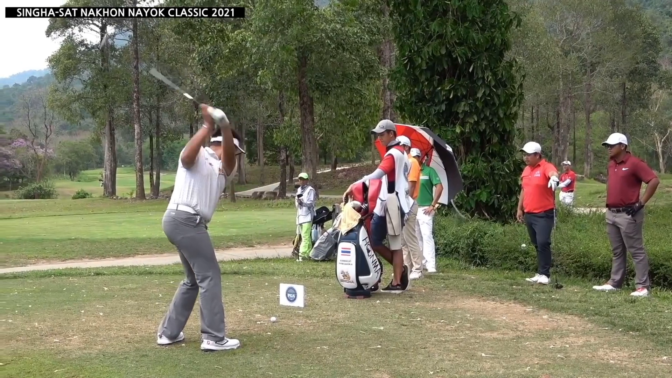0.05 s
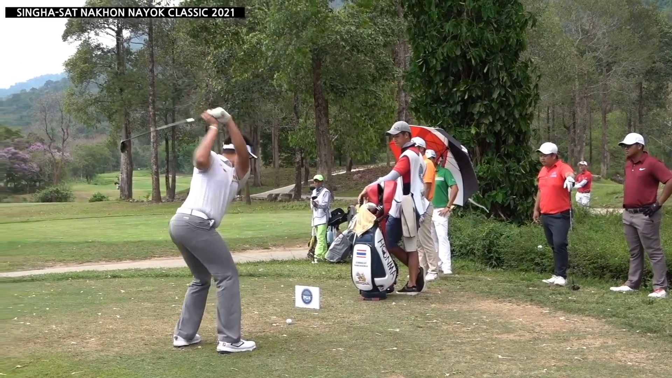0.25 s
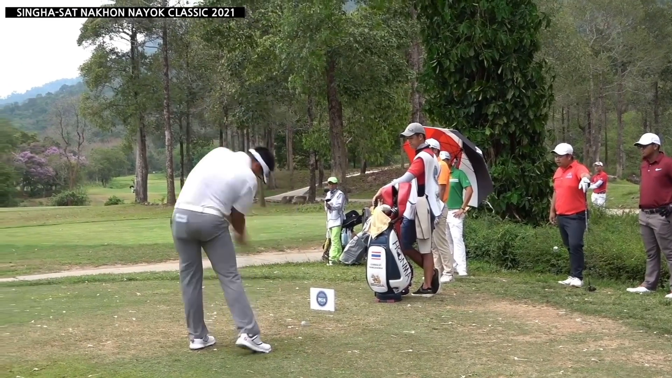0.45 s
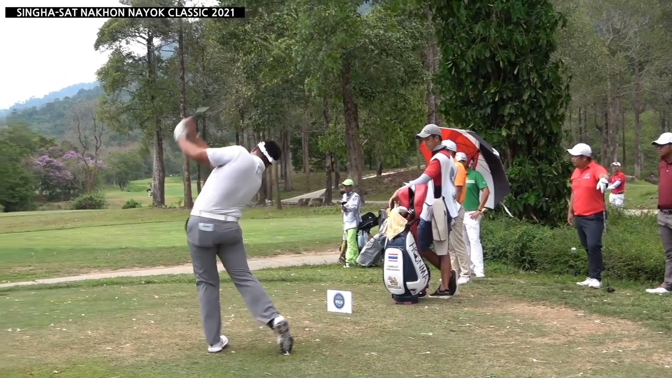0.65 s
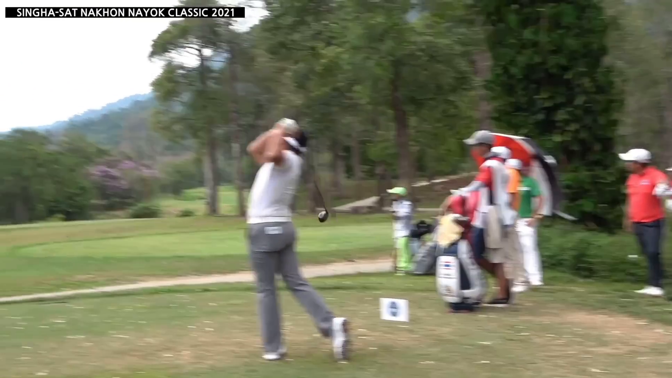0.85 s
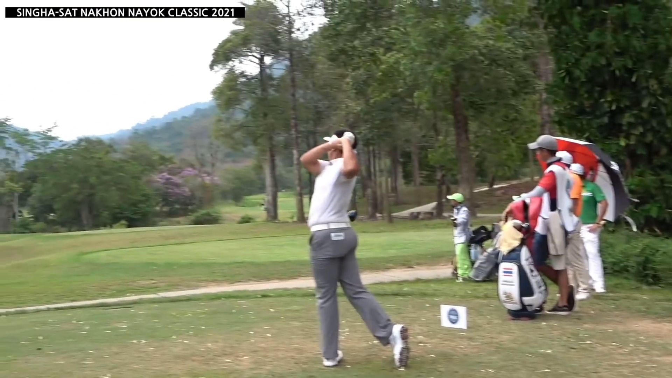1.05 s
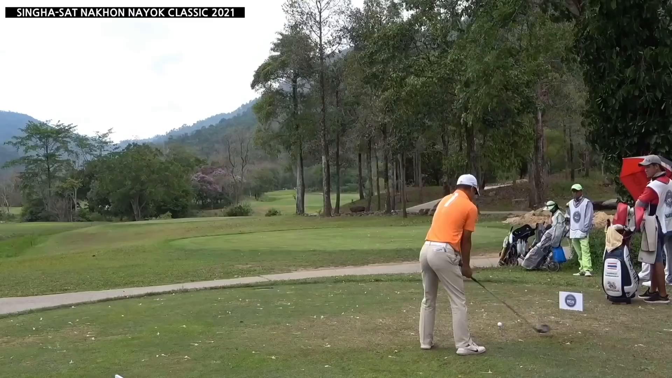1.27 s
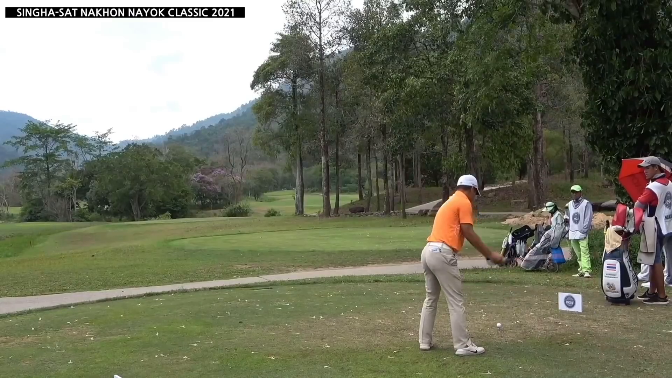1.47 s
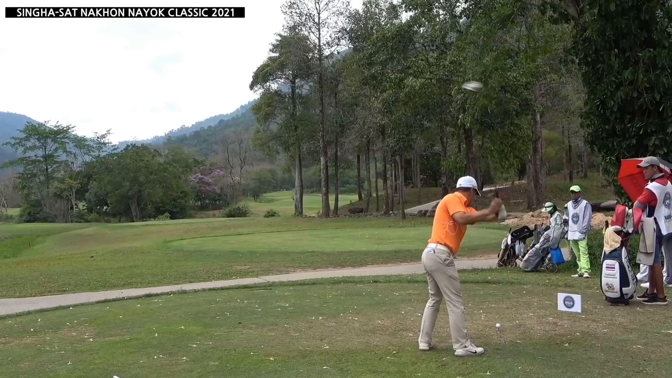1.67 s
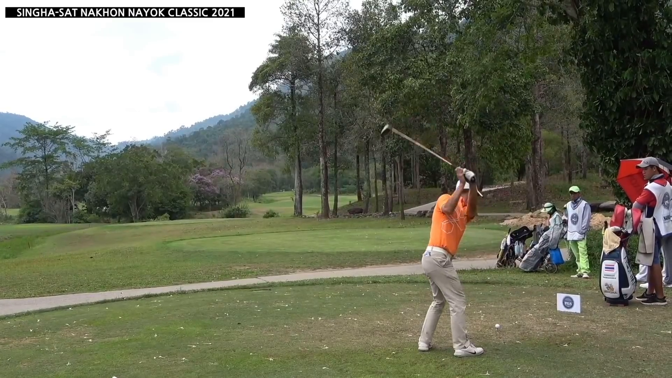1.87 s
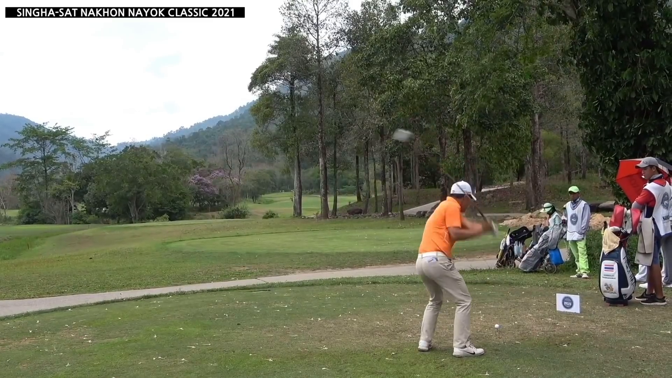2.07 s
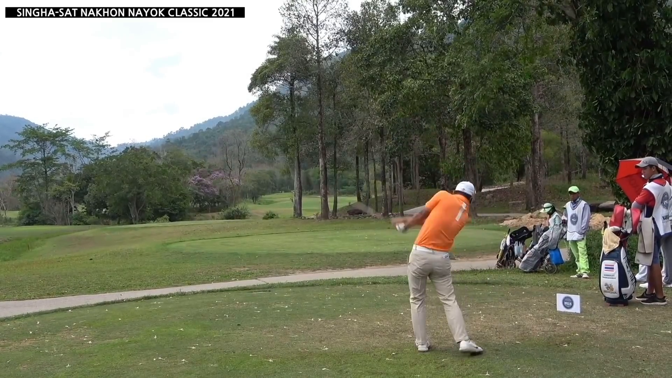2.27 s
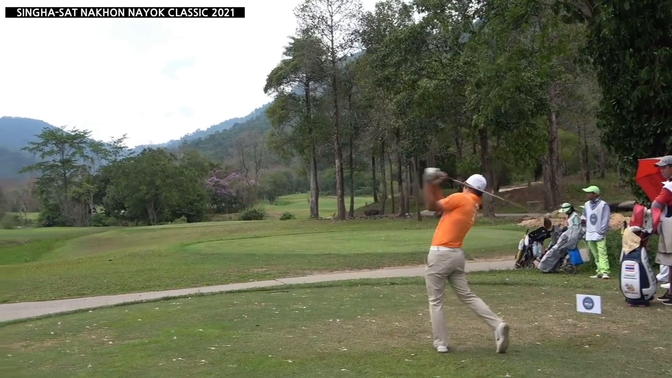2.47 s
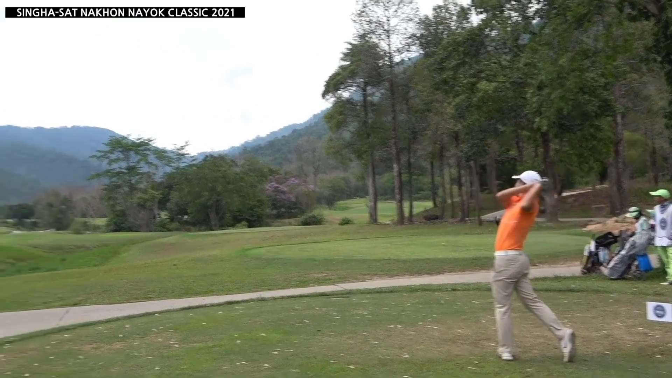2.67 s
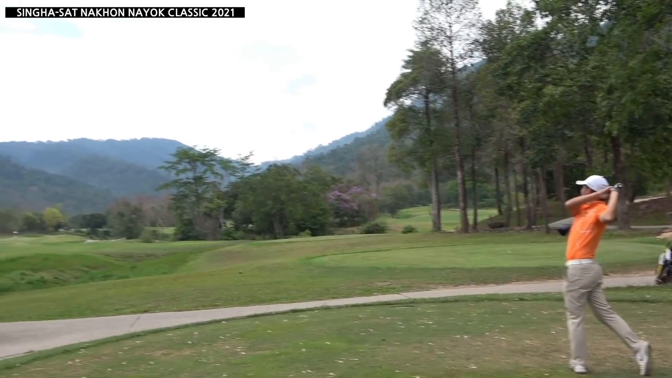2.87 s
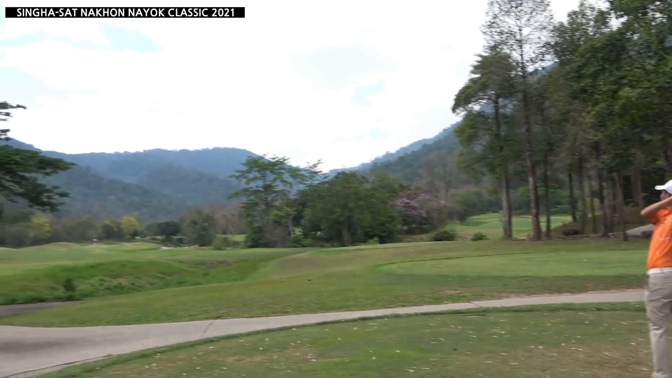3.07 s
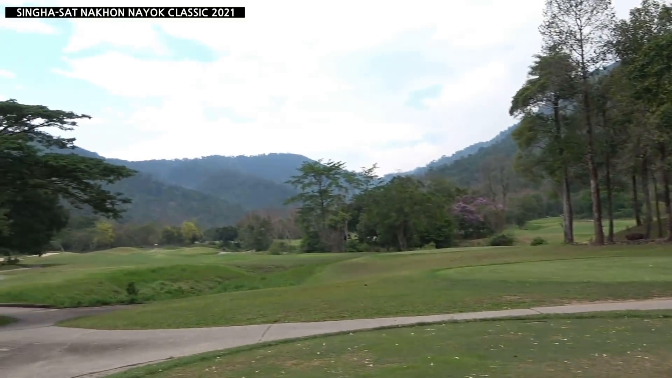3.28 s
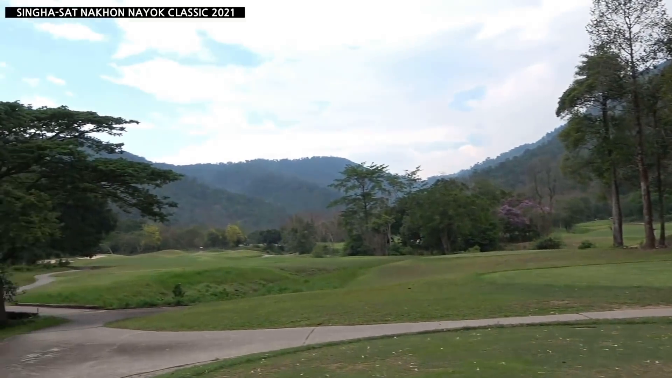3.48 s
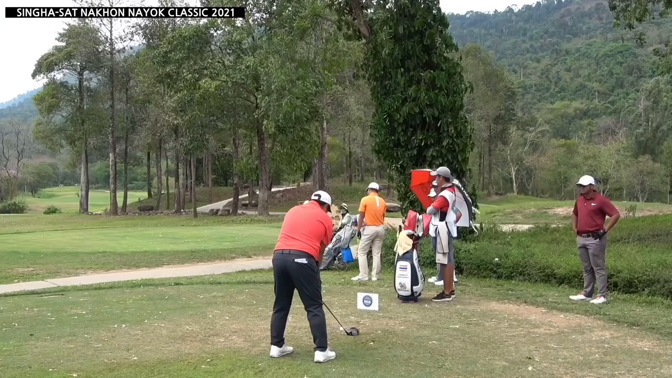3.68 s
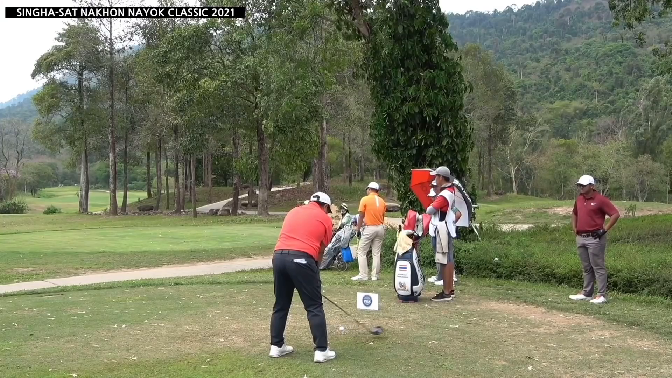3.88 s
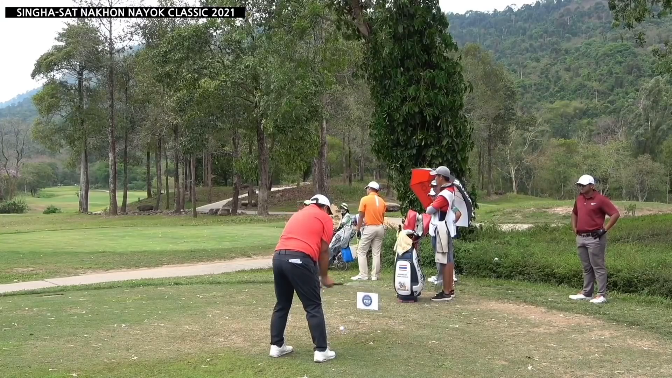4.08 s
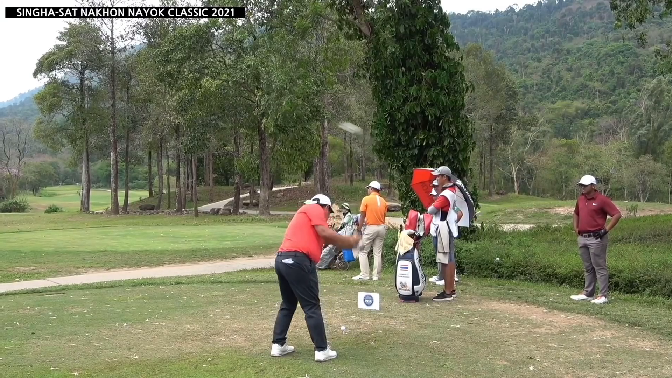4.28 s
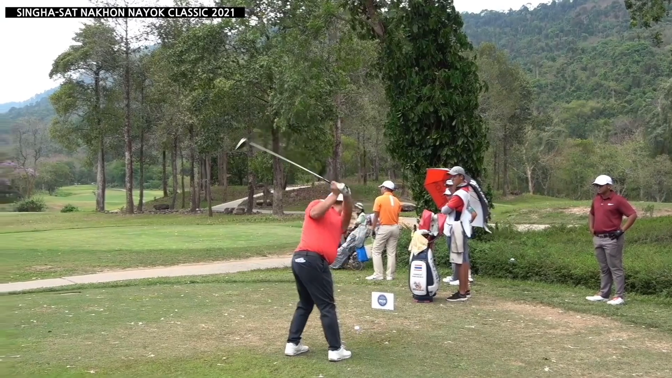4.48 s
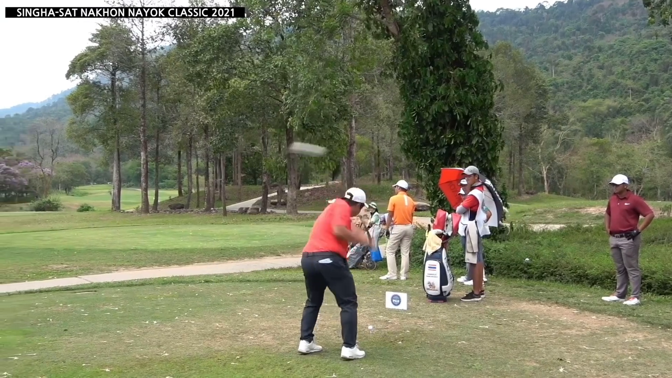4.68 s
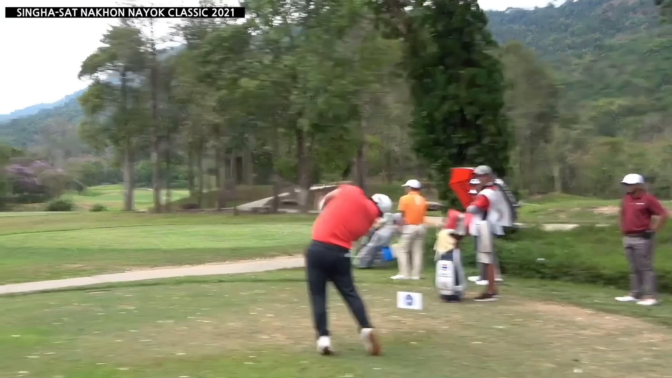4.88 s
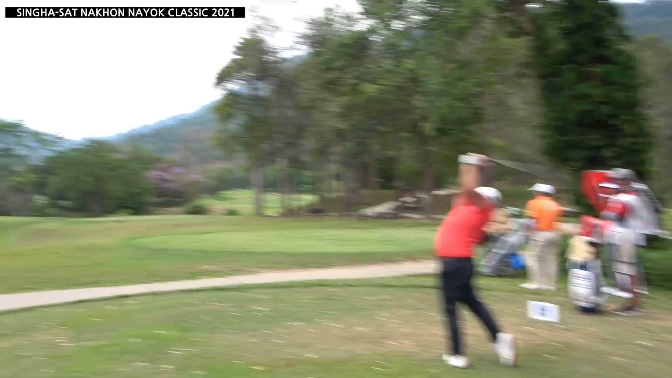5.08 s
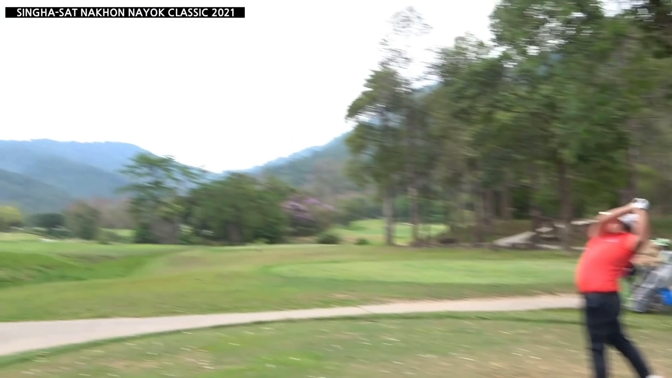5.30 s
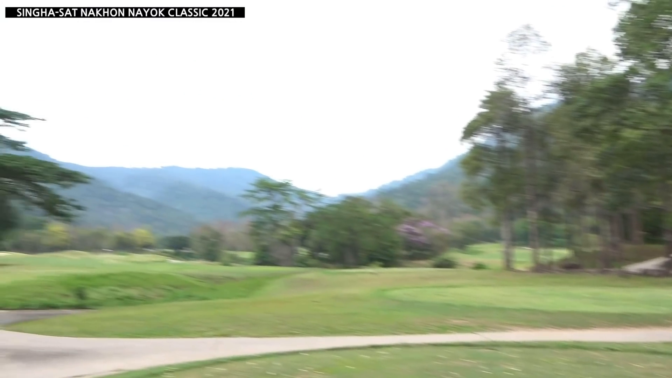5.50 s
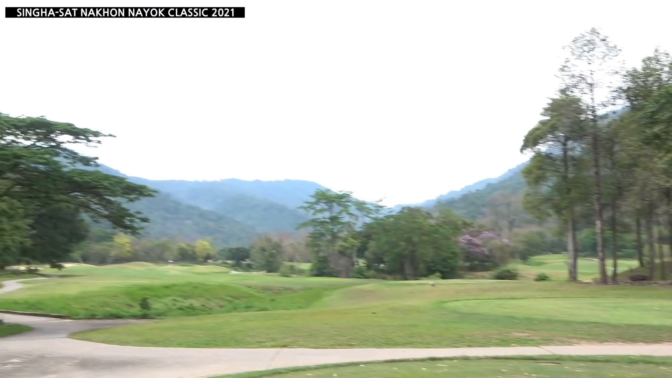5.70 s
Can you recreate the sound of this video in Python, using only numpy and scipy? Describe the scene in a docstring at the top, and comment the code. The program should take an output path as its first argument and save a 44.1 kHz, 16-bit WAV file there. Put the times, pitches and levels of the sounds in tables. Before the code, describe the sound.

Outdoors on a golf tee beside trees, three drives come about two seconds apart. Each has a short rising whoosh, a bright hard crack with a brief metallic ring, then a slightly right-leaning echo fading in the wood. Bird whistles, small knocks and faint insects fill the gaps. The stereo microphone is close, with wind rumble and background ducking at each hit.

```python
"""Three golf drives beside a wood

Close to the stereo microphone each club whooshes up in pitch, cracks against the ball and rings:
a gliding tone with noise bands, a noise burst and narrow resonances. Farther off, the tree line
throws crack and ring back as delayed noise. Birds whistle with gliding sines, small knocks sound
around the tee, and behind lie insects and distant open air as shaped noise. A breeze buffets the
microphone, whose limiter ducks at each hit."""
import sys
import numpy as np
from scipy import signal
from scipy.fft import rfft, irfft
from scipy.io import wavfile
from scipy.ndimage import uniform_filter1d, minimum_filter1d

SR = 44100
rng = np.random.default_rng(int(sys.argv[2]) if len(sys.argv) > 2 else 0)


def digitize_waveform(pressure):
    """Quantize a signal to 16-bit integers and store it at the path in sys.argv[1].

    Rows of a 2-D input are taken as channels; values are limited to [-1, 1].
    """
    field = np.atleast_2d(pressure).T
    bounded = np.clip(field, -1, 1)
    quanta = np.round(bounded * 32767).astype(np.int16)
    wavfile.write(sys.argv[1], SR, quanta)


N = 253384
T = np.arange(N) / SR

# All levels are those ahead of the microphone's limiter.
# drives: (impact time [s], whistle pitch at impact [Hz], whoosh level [dB], early swell level [dB],
# swell lead [s], crack level [dB], nearby scatter level [dB], tree echo level [dB], echo delay [s],
# echo rise [s], tail level [dB], top octave boost [dB], hollow of the head [Hz])
DRIVES = [(0.4610, 862.3, -21, -28, 0.058, -5.5, -20, -23, 0.043, 0.012, -28.5, 5.5, 5120),
          (2.1954, 936, -22, -34.5, 0.054, -6, -14.5, -20, 0.046, 0.0076, -24, 2.5, 2440),
          (4.8098, 865, -24.5, -31.5, 0.058, -4.5, -12.5, -21, 0.048, 0.0064, -27, -1, 3900)]
# ringing modes, one list per club head: (frequency [Hz], level [dB], t60 [s])
HEAD_MODES = [
    [(2760, -26, 0.1), (6280, -10.5, 0.021), (8080, -13, 0.048), (8640, -15, 0.049)],
    [(3266, -21, 0.59), (4440, -18, 0.037), (4870, -17.5, 0.051), (6350, -14.5, 0.084), (7640, -32, 0.087)],
    [(2990, -20.5, 0.13), (3920, -17, 0.049), (5570, -17, 0.083), (7200, -24, 0.046), (7850, -21, 0.044),
     (10400, -19, 0.042)],
]
# colour of the crack: (frequency [Hz], relative level [dB])
CRACK_COLOUR = [(100, -31), (350, -9), (800, -4), (1500, -4), (2400, -3.5), (3700, -5), (5000, -2),
                (6500, 2), (8000, 0.5), (10000, -3), (13000, -11.5), (16000, -22.5)]
# dying away among the trees: (frequency [Hz], t60 [s])
WOOD_DECAY = [(300, 1.0), (2000, 1.0), (7000, 0.68), (14000, 0.58)]
# the echoes lean to the right over most of the range: (frequency [Hz], left over right [dB])
ECHO_BALANCE = [(300, 2), (750, -6), (2000, -3.5), (6000, -3), (12000, -2.5)]
# colour of the turbulence behind the club: (frequency [Hz], relative level [dB])
WAKE_COLOUR = [(60, -40), (300, -20), (900, -9.5), (1700, 1), (3000, -8), (6000, -12), (10000, -16.5),
               (16000, -29)]
# small knocks and scuffs around the tee:
# (time [s], level [dB], centre [Hz], spread [octaves], t60 [s])
TEE_KNOCKS = [(0.76, -30.5, 470, 0.64, 0.048), (0.762, -40.5, 2400, 0.74, 0.054),
              (0.922, -34, 327, 0.55, 0.061), (1.144, -50, 3530, .6, 0.11),
              (1.667, -38.5, 1820, 0.73, 0.031), (2.503, -38, 1090, 1.2, 0.1), (3.043, -52, 8000, .6, 0.03),
              (3.325, -42.5, 3040, 0.56, 0.075), (5.405, -48.5, 1900, 0.6, 0.13),
              (5.437, -56, 7000, 0.65, .05)]
# the long bird whistle sags, swoops up and falls away: (time [s], pitch [Hz], level [dB])
WHISTLE_TUNE = [(4.25, 1513, -41), (4.304, 1417, -48), (4.394, 1375, -44.5), (4.45, 1435, -44),
                (4.558, 1778, -39), (4.6, 1761, -38.5), (4.656, 1344, -44.5), (4.716, 1108, -54.5),
                (4.745, 1080, -51)]
# each time it is sung, perhaps broken off:
# (start [s], length [s], pitch factor [1], level over the tune [dB], extra echo [dB])
WHISTLE_CALLS = [(0.995, 0.16, 0.805, -8, 0), (2.381, 0.46, 0.832, -12.5, 6), (4.247, 0.51, 1, 0.5, 1)]
# short calls of smaller birds:
# (start [s], length [s], first pitch [Hz], middle pitch [Hz], last pitch [Hz], level [dB])
CHIRP_CALLS = [(1.698, 0.15, 2450, 2310, 2250, -66), (2.103, 0.023, 5800, 6220, 6600, -44.5),
               (3.127, 0.1, 2350, 3020, 2400, -53.5), (3.438, 0.084, 2600, 3050, 3270, -62)]
# breeze on the microphone, before fixed trims: (time [s], rumble level [dB], flutter level [dB])
BREEZE_LEVELS = [(0.0, -42.5, -54.5), (0.35, -45, -60.5), (0.45, -46.5, -41), (0.67, -45.5, -56),
                 (1.49, -48, -58.5), (1.62, -37, -41.5), (1.87, -57, -61), (2.05, -49.5, -59),
                 (2.14, -33, -36.5), (2.27, -35, -38), (2.34, -45, -61), (2.38, -35, -40.5),
                 (2.45, -49, -66), (2.5, -27, -45), (2.58, -37, -39), (2.9, -57, -43.5),
                 (3.84, -56.5, -54.5), (4.27, -45, -49), (4.48, -64, -68), (4.75, -44, -54),
                 (4.82, -60, -42), (4.9, -38.5, -46), (5.1, -40.5, -54.5), (5.3, -39, -45),
                 (5.39, -39, -55), (5.75, -47.5, -61.5)]
# colour of the large eddies: (frequency [Hz], relative level [dB])
RUMBLE_COLOUR = [(15, -17), (30, 0), (55, -0.5), (100, 3), (130, -2), (200, -44), (400, -49.5)]
# colour of the small eddies: (frequency [Hz], relative level [dB])
FLUTTER_COLOUR = [(120, -38), (200, 0.5), (270, 2), (380, -5), (520, -11), (900, -34), (1600, -45)]
# colour of the distant open air: (frequency [Hz], relative level [dB])
AIR_COLOUR = [(25, -52), (90, 2), (250, -3), (450, -0.5), (780, 3.5), (1200, -6.5), (2300, -9), (3600, -14),
              (6000, -16.5), (9000, -18.5), (11000, -20.5), (13500, -28), (16000, -27)]
# the open air comes more from all sides in the high treble: (frequency [Hz], side over mid [1])
AIR_SPREAD = [(500, 0.19), (2500, 0.088), (7000, 0.48), (11000, 0.98)]
# insect chorus: (centre [Hz], nominal width before narrowing [Hz], mean level [dB])
INSECT_BANDS = [(4883, 470, -62.5), (7400, 330, -69), (7920, 200, -71), (9740, 130, -79.5)]

# the downswing gains speed steadily up to the ball, and is heard for its last moments only
RUN_UP_S, HEARD_S, ONSET_S, LOUDNESS_POWER = 0.18, 0.084, 0.011, 4.03
# the shaft sweeps past a little before the head and gives an early swell
SWELL_WIDTH_S = 0.012
# past the ball the club slows and gives one softer, lower puff
SLOWING_S, FOLLOW_DB, FOLLOW_LAG_S, FOLLOW_WIDTH_S = 0.05, -11, 0.023, 0.019


def from_db(db):
    """Decibels to gain."""
    return 10 ** (np.asarray(db) / 20)


def rms_one(x):
    """Scale to unit power."""
    return x / np.sqrt(np.mean(x ** 2) + 1e-20)


def at_hz(points, hz):
    """Read a table on a log-frequency axis."""
    known_hz, values = np.transpose(points)
    return np.interp(np.log(hz + 1), np.log(known_hz), values)


def pan(db):
    """Left and right gains for a left-over-right difference."""
    return from_db(np.array([[.5], [-.5]]) * db)


def noise(gain_at, size, width):
    """Stereo noise of a given gain over frequency; width is side over mid, one or one per frequency."""
    hz = np.fft.rfftfreq(size, 1 / SR)
    mid, side = rfft(rng.standard_normal((2, size))) * gain_at(hz)
    left_right = mid + width * side * np.array([[1], [-1]])
    return rms_one(irfft(left_right, size))


def coloured(points, size, width):
    """Stereo noise that follows a spectrum table."""
    return noise(lambda hz: from_db(at_hz(points, hz)), size, width)


def drift(rate_hz, size):
    """Slow chance with unit power."""
    return noise(lambda hz: np.exp(-(hz / rate_hz) ** 2), size, 0)[0]


def fade(t, t60):
    """Exponential decay that begins at t = 0."""
    return (t >= 0) * from_db(-60 * np.maximum(t, 0) / t60)


def step(t, rise):
    """Smooth rise from 0 to 1 around t = 0."""
    return .5 + .5 * np.tanh(t / rise)


def swell(t, width):
    """Bell-shaped rise and fall around t = 0."""
    return np.exp(-(t / width) ** 2)


def add(out, s, sound):
    """Mix a sound in at time s."""
    at = round(s * SR)
    out[:, at:at + sound.shape[-1]] += sound[..., :N - at]


def drive(modes, crack_db, near_db, echo_db, delay, rise, tail_db, top_db, hollow_hz,
          mode_width_hz=125, club_pan_db=-1.5):
    """Crack and ring of the head, scattered first by ground and bags, then by tree line and wood."""
    t, hz = np.arange(SR) / SR, np.fft.rfftfreq(SR, 1 / SR)
    direct = from_db(crack_db) * fade(t, 0.014) * step(t - .0005, 0.00044)
    near = step(t - .009, 0.0063) * step(.036 - t, 0.0083)
    arrival = step(t - delay, rise)
    trees = from_db(echo_db) * arrival * swell(t - delay, 0.051)

    def tail(t60):
        return from_db(tail_db) * arrival * fade(np.abs(t - delay), t60)

    hollow_db = -9 * swell(hz - hollow_hz, 420)
    top_octave_db = top_db * step(hz - 11500, 1500)
    colour = from_db(at_hz(CRACK_COLOUR, hz) + top_octave_db + hollow_db)
    # single objects and trunks return separate small echoes
    grain_db = 1.0 * drift(260, SR)
    nearby = from_db(near_db + grain_db) * near * fade(t, 0.18)
    out = noise(lambda _: colour, SR, 0.12) * np.hypot(direct, nearby) * pan(club_pan_db)

    returning = rfft(noise(lambda _: colour, SR, 0.11)) * pan(at_hz(ECHO_BALANCE, hz))
    decay_hz, decay_t60 = np.transpose(WOOD_DECAY)
    # overlapping bands, each dying away at its own rate
    for share, t60 in zip(np.eye(len(decay_t60)), decay_t60):
        band = irfft(returning * at_hz(np.c_[decay_hz, share], hz), SR)
        flicker = from_db(grain_db + 1.0 * drift(28, SR))
        out = out + band * flicker * np.hypot(trees, tail(t60))

    for mode_hz, db, t60 in modes:
        # many paths blur each mode into a narrow band of fairly even strength
        ring = noise(lambda hz: 1 / (1 + ((hz - mode_hz) / mode_width_hz) ** 4), SR, 0.093)
        envelope = np.abs(signal.hilbert(ring.mean(axis=0)))
        ring = rms_one(ring / envelope ** .5)
        close = (0.55 * fade(t, 0.03) + near) * fade(t, t60) * pan(club_pan_db)
        far = from_db(2.5) * (trees + tail(0.7)) * pan(at_hz(ECHO_BALANCE, mode_hz))
        out = out + from_db(db) * ring * (close + far)
    return out


def whoosh(top_hz, top_db, swell_db, swell_lead_s, flutter_hz=130, unsteady=0.88,
           shaft_share=0.41, head_share=0.38, wake_db=-10, wake_growth=1.25):
    """Vortices leave the club at a pitch that follows its speed; the wake hisses more with speed."""
    t = np.arange(SR) / SR - RUN_UP_S   # time from impact
    speed = np.minimum(1 + t / RUN_UP_S, np.exp(-t / SLOWING_S)).clip(0, 1)
    heard = step(t + HEARD_S, ONSET_S) * step(-t, 0.001)
    downswing = from_db(top_db) * speed ** LOUDNESS_POWER * heard
    early = from_db(swell_db) * swell(t + swell_lead_s, SWELL_WIDTH_S)
    follow_through = from_db(top_db + FOLLOW_DB) * swell(t - FOLLOW_LAG_S, FOLLOW_WIDTH_S)
    phase = 2 * np.pi * np.cumsum(top_hz * speed) / SR

    def band(turn, width_hz):
        return np.cos(turn) * drift(width_hz, SR) + np.sin(turn) * drift(width_hz, SR)

    # the shedding is regular only while the club still gains speed
    tone = np.cos(phase) * step(-t, 0.016) + unsteady * band(phase, flutter_hz)
    # the slow inner shaft sheds a lower band, the fast tip a higher one
    shaft = shaft_share * band(.72 * phase, 340)
    tip = head_share * band(1.2 * phase, 274)
    whistle = rms_one(tone + shaft + tip)
    wake_gain = from_db(wake_db + 2.0 * drift(53, SR)) * speed ** wake_growth
    wake = wake_gain * coloured(WAKE_COLOUR, SR, 0.039)
    return (np.hypot(downswing, early) + follow_through) * (whistle + wake) * pan(-1.8)


def knock(db, centre_hz, spread, t60):
    """A short, dull or bright burst: noise around one frequency, dying away exponentially."""
    t = np.arange(SR) / SR
    burst = noise(lambda hz: np.exp(-.5 * (np.log2((hz + 1) / centre_hz) / spread) ** 2), SR, 0.1)
    return from_db(db) * burst * fade(t, t60) * step(t - .001, 0.00025)


def calls(glide_s=0.027, edge_s=0.021):
    """Bird calls as (start, pitch, loudness, extra echo): whistles share a tune, chirps follow a curve."""
    tune_s, tune_hz, tune_db = np.transpose(WHISTLE_TUNE)
    tune_s = tune_s - tune_s[0]
    for s, length, factor, db, echo_db in WHISTLE_CALLS:
        t = np.arange(int(length * SR)) / SR
        hz = uniform_filter1d(np.interp(t, tune_s, tune_hz), size=int(glide_s * SR))
        edges = np.tanh(np.minimum(t, length - t) / edge_s)
        yield s, factor * hz, from_db(db + np.interp(t, tune_s, tune_db)) * edges, echo_db
    for s, length, *arch_hz, db in CHIRP_CALLS:
        along = np.linspace(0, 1, int(length * SR))
        hz = np.polyval(np.polyfit([0, .5, 1], arch_hz, 2), along)
        yield s, hz, from_db(db) * np.sin(np.pi * along), 0


def birds(overtone_db=-33, wood_db=-7, wood_t60=2.0, branches_db=-6, quaver=0.0042, tremble_db=2.0):
    """Nearly pure gliding whistles; echoes from branches and wood beat against the moving pitch."""
    song, into_wood = np.zeros((2, 1, N))
    for s, hz, level, echo_db in calls():
        wobble = 1 + quaver * drift(51, SR)[:len(hz)]
        tremble = from_db(tremble_db * drift(50, SR)[:len(hz)])
        phase = 2 * np.pi * np.cumsum(wobble * hz) / SR
        overtones = sum(np.sin(k * phase) for k in range(2, 6))
        voice = np.sin(phase) + from_db(overtone_db) * overtones
        call = np.sqrt(2) * level * tremble * voice   # levels count as RMS
        add(song, s, call)
        add(into_wood, s, from_db(echo_db) * call)
    t = np.arange(SR) / SR

    def scatter(start, t60):
        return rms_one(noise(np.ones_like, SR, 0.06) * fade(t - start, t60)) / np.sqrt(SR)

    branches = from_db(branches_db) * scatter(0.0095, 0.05)
    wood = from_db(wood_db) * scatter(0.044, wood_t60)
    echoes = signal.fftconvolve(into_wood, branches + wood, axes=1)[:, :N]
    return (song + echoes) * pan(-0.84)


def breeze(middle_db=-2.5, pan_db=3.5):
    """Eddies on the microphone: large ones rumble, small ones flutter, sizes between follow both."""
    s, *levels = np.transpose(BREEZE_LEVELS)
    rumble_db, flutter_db = (np.interp(T, s, db) for db in levels)
    rumble = from_db(rumble_db + 0.5) * coloured(RUMBLE_COLOUR, N, 0.061)
    middle_gain = from_db((rumble_db + flutter_db) / 2 + middle_db + 2.5 * drift(42, N))
    middle = middle_gain * noise(lambda hz: swell(hz - 160, 50), N, 0.22)
    flutter_gain = from_db(flutter_db - 2.5 + 3.02 * drift(32, N))
    flutter = flutter_gain * coloured(FLUTTER_COLOUR, N, 0.044)
    return (rumble + middle + flutter) * pan(pan_db)


def countryside(air_db=-52.5, pan_db=-1):
    """Far, even hush of coloured noise with the shrill, slowly wavering bands of insects."""
    width = at_hz(AIR_SPREAD, np.fft.rfftfreq(N, 1 / SR))
    out = from_db(air_db) * coloured(AIR_COLOUR, N, width)
    for centre_hz, width_hz, db in INSECT_BANDS:
        band = noise(lambda hz: 1 / (1 + ((hz - centre_hz) / (0.74 * width_hz)) ** 2), N, 0.064)
        out = out + from_db(db + 1.5 * drift(6.0, N)) * band
    return out * pan(pan_db)


def scene():
    """Swings, hits and knocks over the birds, the breeze and the open air."""
    out = countryside() + breeze() + birds()
    for (s, top_hz, top_db, swell_db, swell_lead_s, *hit), modes in zip(DRIVES, HEAD_MODES):
        add(out, s - RUN_UP_S, whoosh(top_hz, top_db, swell_db, swell_lead_s))
        add(out, s, drive(modes, *hit))
    for s, *shape in TEE_KNOCKS:
        add(out, s, knock(*shape))
    return out


def limiter(x, ceiling_db=-16.5, release_db_per_s=170):
    """Looks a few milliseconds ahead, ducks and recovers steadily."""
    power = np.maximum(uniform_filter1d(np.mean(x ** 2, axis=0), size=90), 1e-12)
    over_db = np.maximum(10 * np.log10(power) - ceiling_db, 0)
    recovery_db = release_db_per_s * T
    held_db = np.maximum.accumulate(over_db + recovery_db) - recovery_db
    # the centred windows begin each duck ahead of its hit
    ducking_db = uniform_filter1d(minimum_filter1d(-held_db, size=300), size=100)
    return x * from_db(ducking_db)


def record(dry, cutoff_hz=15900):
    """The microphone's limiter, then a steep low-pass cuts the top."""
    low_pass = signal.ellip(12, .1, 80, cutoff_hz, fs=SR, output="sos")
    return signal.sosfilt(low_pass, limiter(dry))


dry = scene()
out = record(dry)
digitize_waveform(out)
```